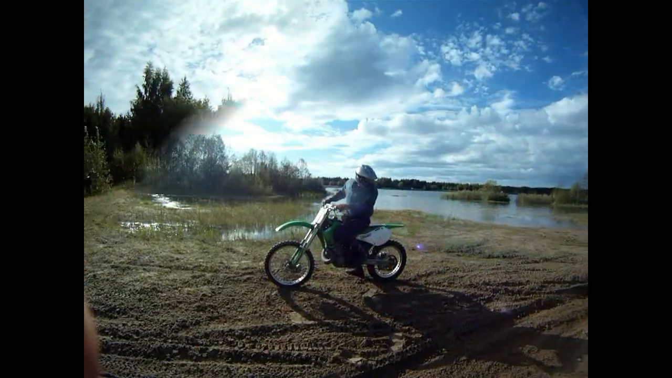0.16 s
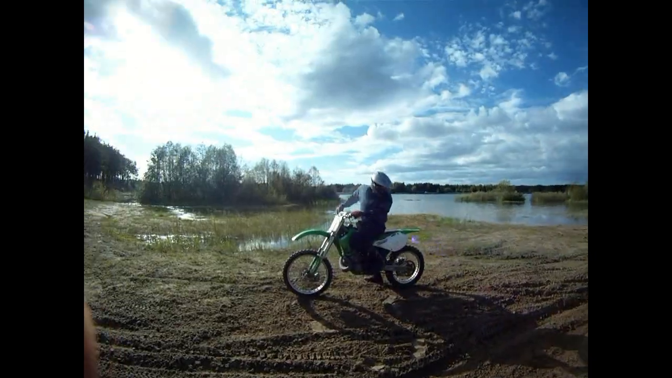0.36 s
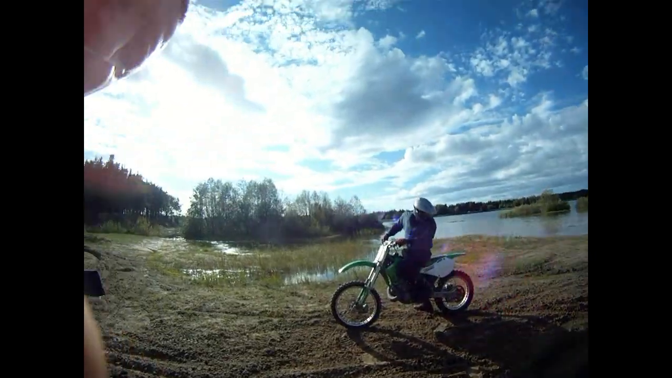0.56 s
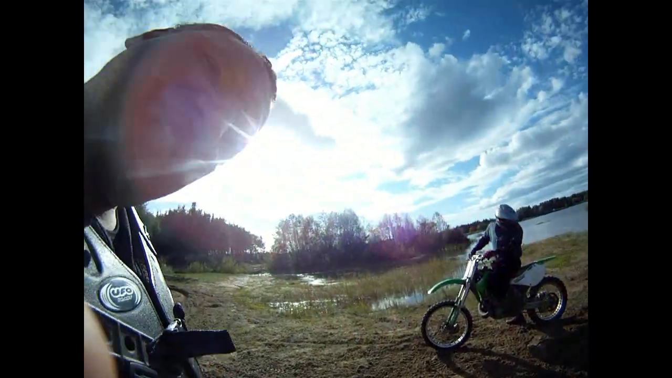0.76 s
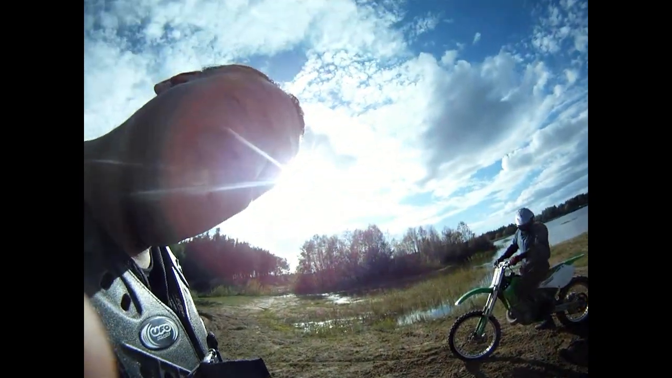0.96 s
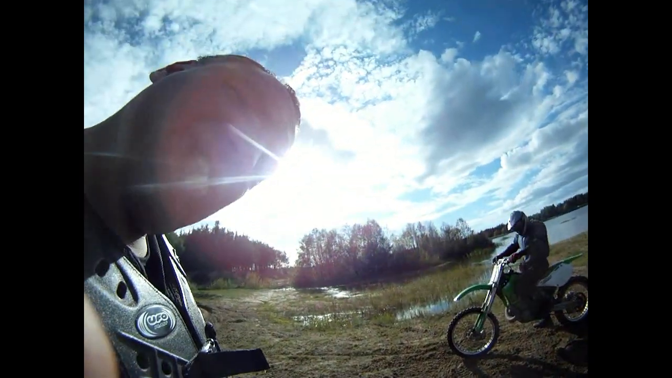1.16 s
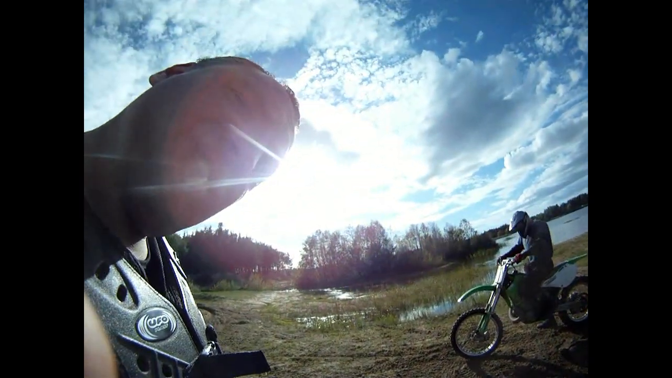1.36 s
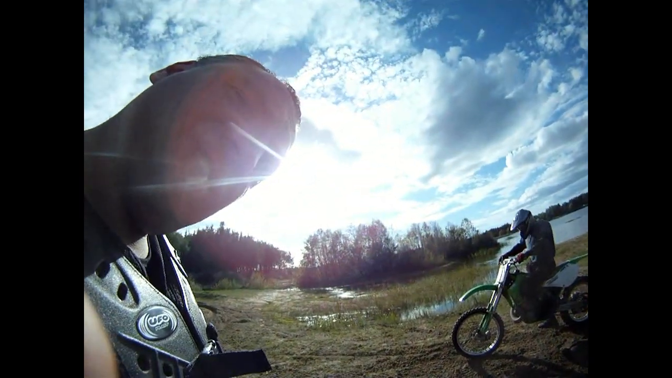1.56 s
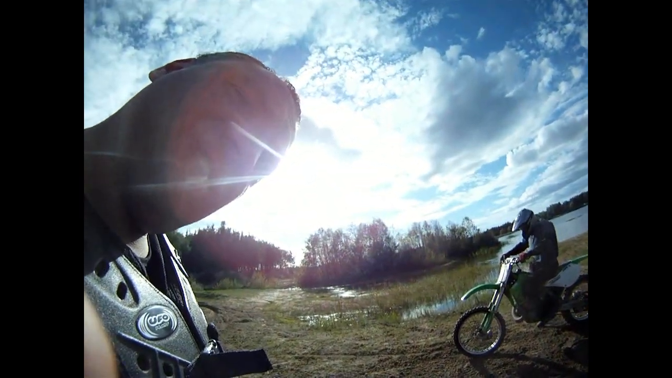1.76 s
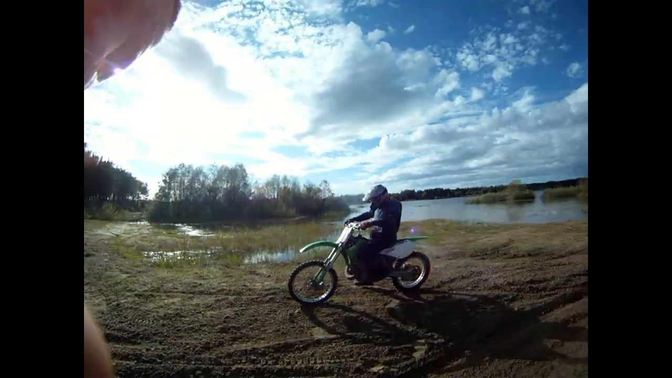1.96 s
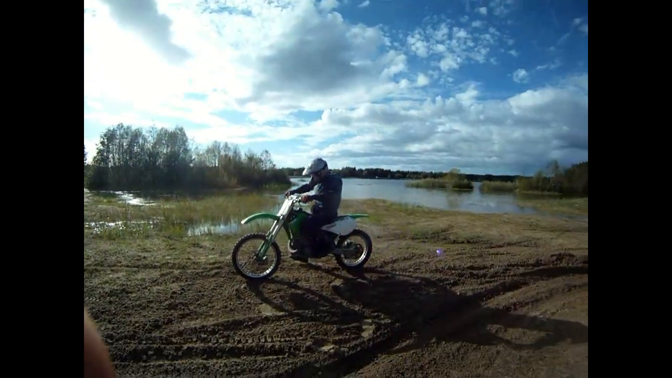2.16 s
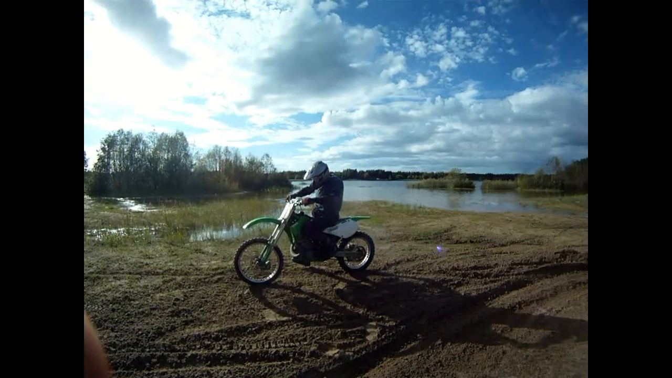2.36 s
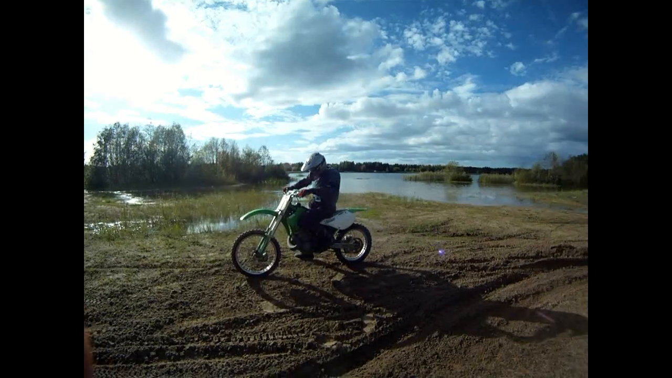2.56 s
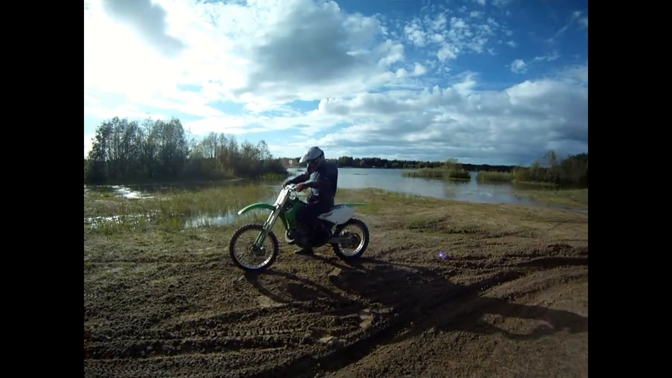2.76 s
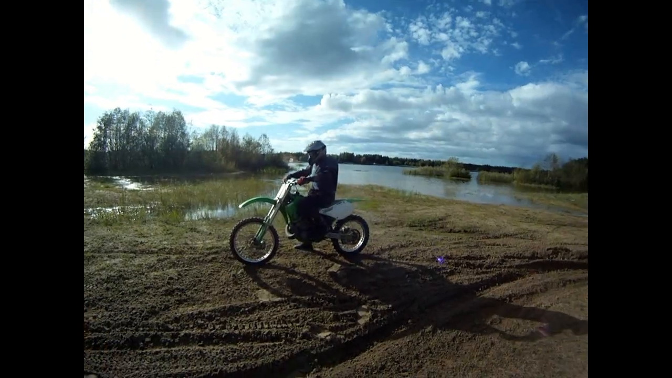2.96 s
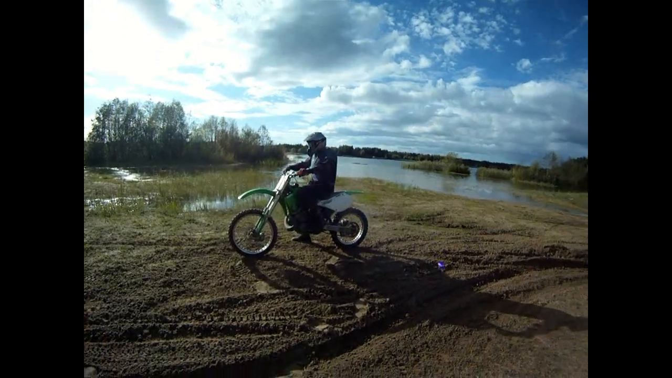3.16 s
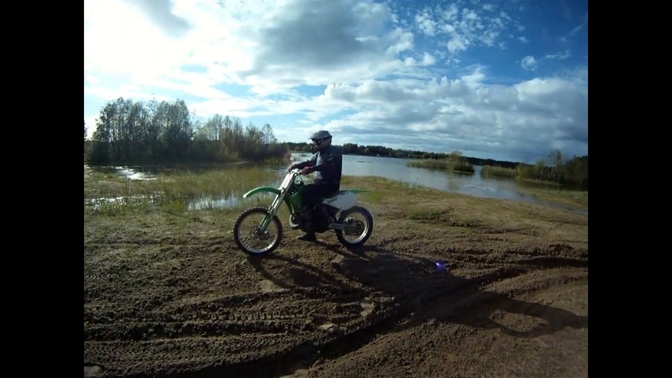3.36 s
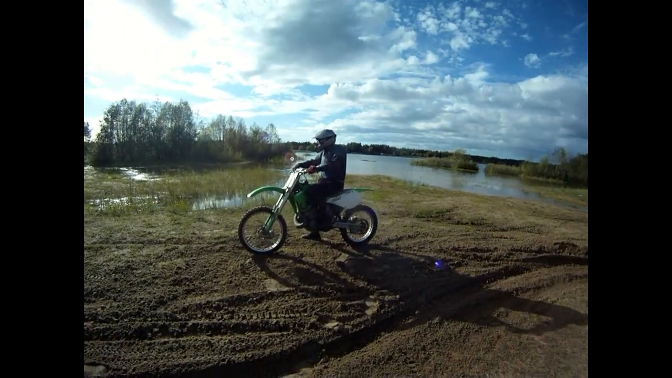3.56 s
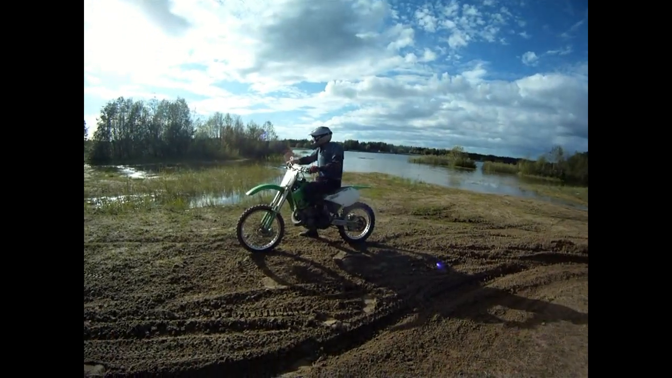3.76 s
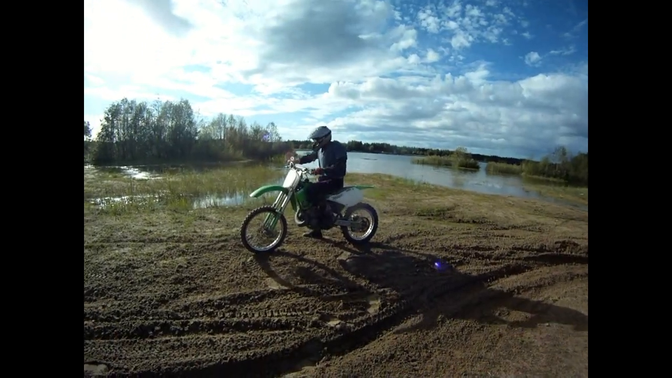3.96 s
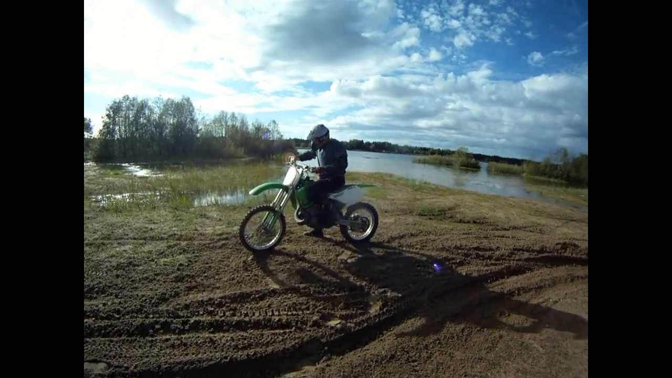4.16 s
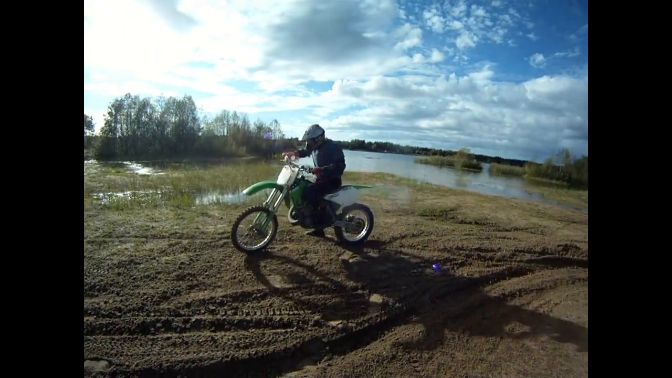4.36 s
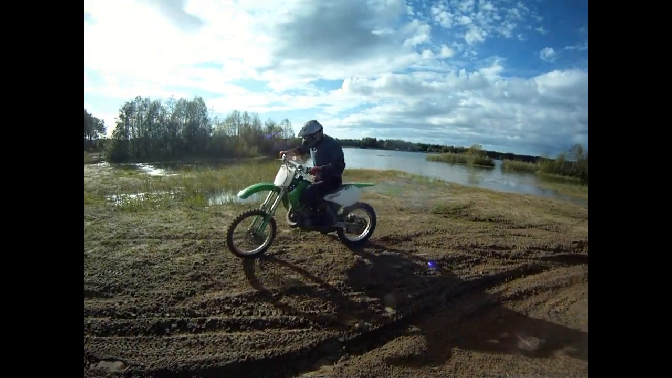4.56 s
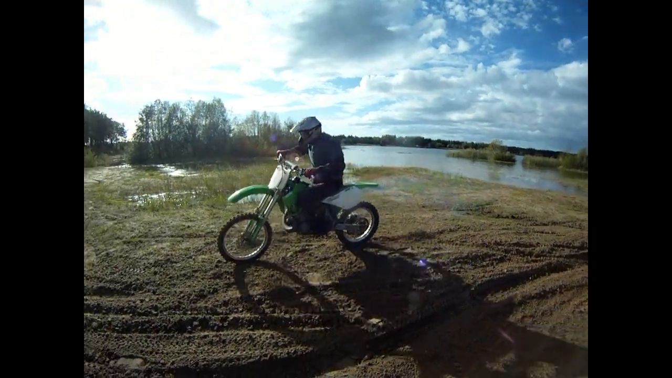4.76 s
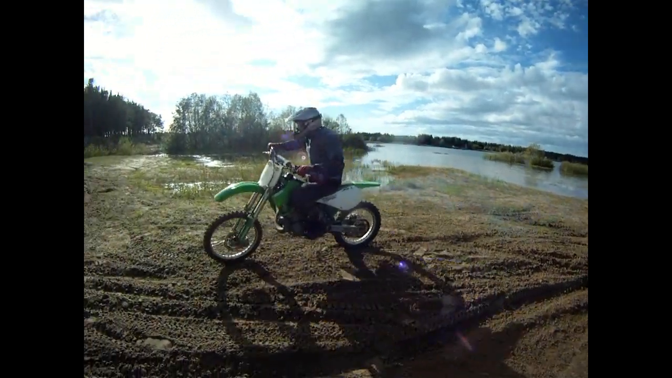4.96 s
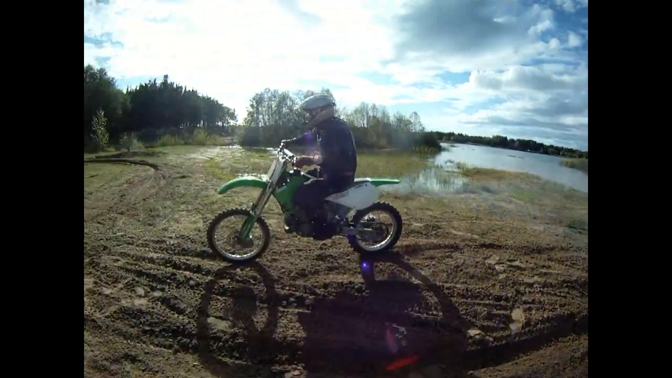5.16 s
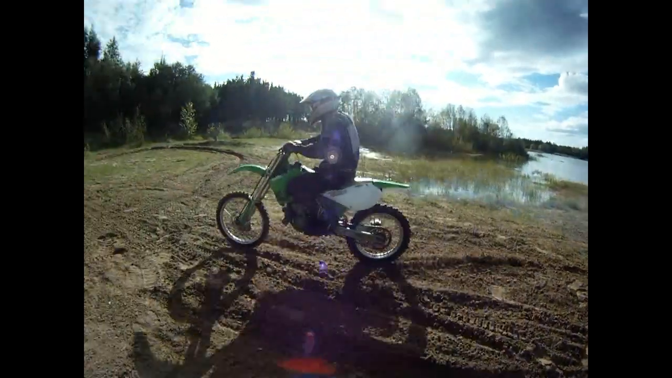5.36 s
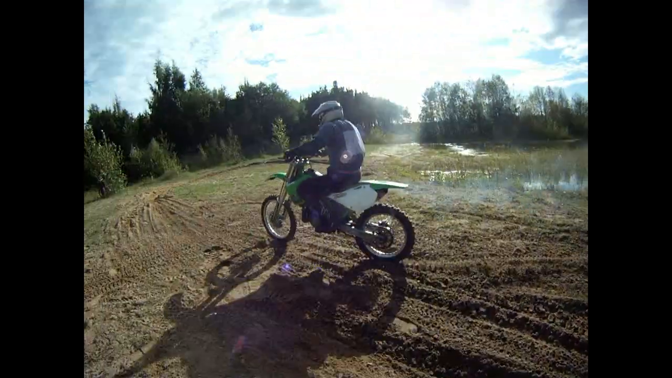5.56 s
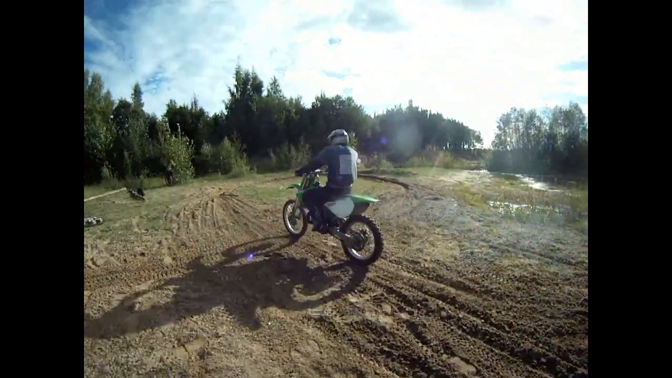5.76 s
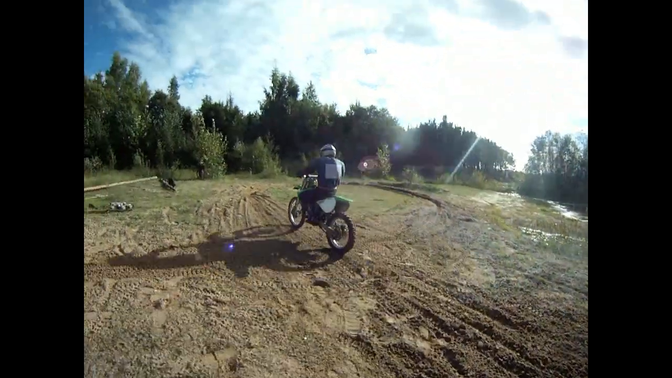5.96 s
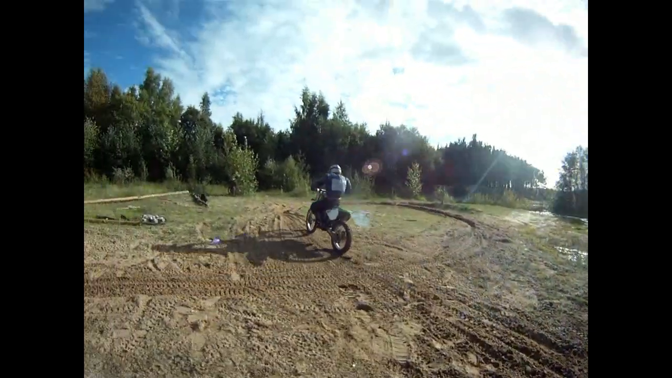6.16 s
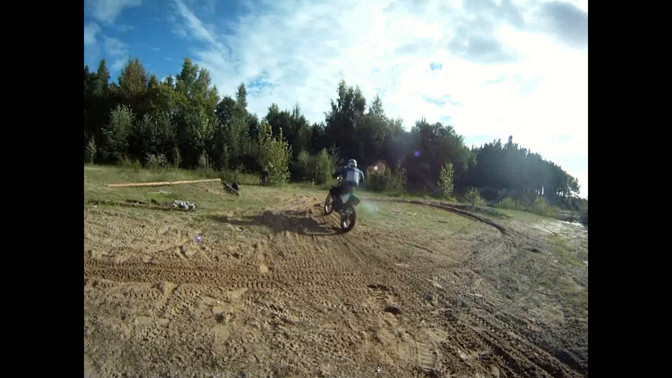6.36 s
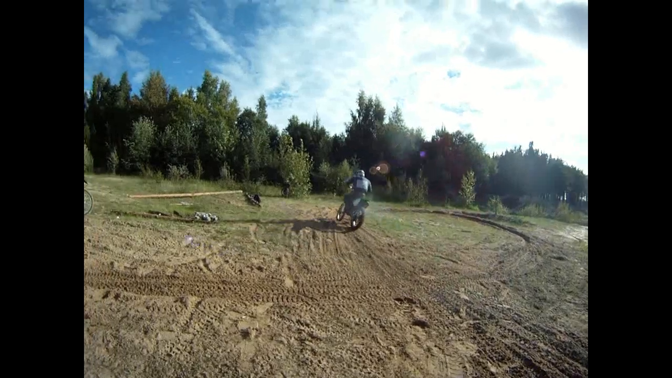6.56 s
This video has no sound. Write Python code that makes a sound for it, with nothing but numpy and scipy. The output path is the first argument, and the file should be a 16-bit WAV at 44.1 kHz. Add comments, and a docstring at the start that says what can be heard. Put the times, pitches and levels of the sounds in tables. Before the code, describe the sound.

A two-stroke dirt bike winds down to a lumpy idle close by, catches with sharp cracks, then pulls away in light wind.

```python
"""A single-cylinder two-stroke dirt bike, heard from close by on the microphone of a cased action camera.
It coasts down from high revs, each firing booming in the expansion pipe and rattling the fins, and by 3 s
is at a lumpy idle. Near 4 s it catches with cracks and chugs, then pulls away under load, tail to the
microphone; at 6 s it blips once more further off. All along, wind buffets the case, and the camera samples
at a low rate and holds each sample, which mirrors the sound into the treble."""
import sys
import numpy as np
from scipy import signal
from scipy.fft import rfft, irfft, next_fast_len
from scipy.io import wavfile
from scipy.ndimage import uniform_filter1d, map_coordinates

SR = 44100
rng = np.random.default_rng(int(sys.argv[2]) if len(sys.argv) > 2 else 0)


def put_to_file(sound):
    """Save the sound as 16-bit audio at rate SR, in the file named by the first command-line argument."""
    columns = np.atleast_2d(sound).T  # one column per channel
    safe = np.clip(columns, -1, 1)
    whole_steps = np.round(safe * 32767)
    wavfile.write(sys.argv[1], SR, whole_steps.astype(np.int16))


N = 292383
T = np.arange(N) / SR
HZ = np.fft.rfftfreq(next_fast_len(N + SR // 2), 1 / SR)

# Engine speed. Each row: time in seconds, firings per second.
REVS = [(0.0, 151.8), (0.66, 112.9), (1.0, 95.2), (1.22, 86.05), (2.12, 61.1), (3.16, 41.89),
        (3.549, 38.38), (3.882, 32.58), (4.021, 55.55), (4.068, 79.8), (4.131, 62.4), (4.26, 75.07),
        (4.36, 78.7), (4.49, 90.1), (4.599, 93.9), (4.732, 90.9), (4.871, 81), (4.928, 81.67),
        (5.13, 77.14), (5.22, 78.5), (5.341, 74.55), (5.602, 70.74), (5.689, 72.4), (5.8, 51.72),
        (6.08, 47.78), (6.149, 71.5), (6.222, 76.85), (6.311, 55), (6.63, 43.46)]
# The rider's hand and the burning. Each row: time in seconds, throttle 0-1, unevenness about 0-1.
BURNING = [(0, 0.14, 0), (2.3, 0.04, 0.43), (3.4, 0.03, 0.84), (3.79, 0, 0.85), (3.805, 0.72, 0.67),
           (3.85, 0, 0.97), (3.975, 0, 0.99), (3.985, 0.91, 0.6), (4.075, 0.7, 0.9), (4.085, 0, 1.02),
           (4.105, 0.1, 0.9), (4.112, 0, 0.77), (4.23, 0.88, 0.03), (5.69, 0.89, 0.02), (5.715, 0.04, 0.43),
           (6.63, 0.17, 0.2)]
# Level at the microphone, throttle shut. Each row: time in seconds, boom in dB, rattle in dB.
SHUT_LEVELS = [(0, -38, -15), (.2, -26.5, -19.5), (.45, -28.5, -20), (.65, -22, -19), (.85, -20.5, -23.5),
               (1.55, -22, -24.5), (1.9, -29, -26), (2.68, -36.5, -28), (3.05, -35, -29.5),
               (3.8, -43.5, -34), (4.2, -33.5, -25.5), (4.74, -34, -26), (4.88, -28, -29),
               (5.0, -30.5, -27), (5.26, -32.5, -29.5), (5.6, -35.5, -29.5), (5.7, -39.5, -30.5),
               (5.85, -37, -30.5), (6.04, -41.5, -33), (6.44, -46.5, -36), (6.63, -61, -42)]
# The level drops at once and climbs back. Each row: start in seconds, depth in dB, recovery in seconds.
LEVEL_DIPS = [(0, 19.5, 0.23), (0.192, 14.5, 0.27), (3.06, 4, 0.4), (6.215, 6.5, 0.073)]
# How the bike faces the microphone.
# Each row: time in seconds, side on 0 to tail on 1, tail pipe ring in dB over the rattle.
FACING = [(0, 0.06, -21), (.63, 0, -9.5), (1.2, 0.16, -40), (2.9, 0.1, -14), (3.9, 0.21, -20),
          (4.25, 0.3, -19), (4.6, 0.19, -50), (5.2, 0.75, -18), (5.5, 0.8, -40), (5.65, 0.88, -19),
          (5.87, 0.72, -1), (6.1, 0.88, -22)]
# Lowest engine orders. Each row: firings per second, then in dB over the rattle the first and the
# second order with the throttle shut, and the first at full throttle.
ORDER_LEVELS = [(40, -34, -26, -10), (50, -25, -12, -22), (57.3, -21, -26, -29), (66.6, -9, -9.5, -30),
                (79, -8, -19.5, -60), (82.6, -10, -11, -51), (90, -21, -11, -29), (94.4, -9, -16, -27),
                (102, -8.5, -14, -26), (123, -7.5, -12.5, -21), (132, -6.5, -26, -25), (160.5, 2, 5, -27)]
# Expansion pipe modes. Each row: centre in Hz, width in Hz, gain in dB.
BELLY_MODE = [(354, 166, 0)]  # the wide belly that all the others pass through
SIDE_MODES = [(226, 77, -5), (372.4, 33, 6.5), (448, 49, 12)]
LOADED_SIDE_MODES = [(382, 45, 4.5), (461, 56, 4.5)]  # damped more
TAIL_MODES = [(304, 70, -4), (375, 33.6, 12), (453, 44, 10.5)]
HOLLOW_MODE = [(234, 25, 0)]  # slow engine
COASTING_MODE = [(657, 96, 0)]  # fast engine off load
# Exhaust bands, each applied twice. Each row: centre in Hz, width in Hz, gain per pass in dB.
BARK_SIDE = [(937, 340, 5.5), (1334, 150, 4)]
BARK_TAIL = [(832, 324, 28), (1440, 170, 27)]
RING_BAND = [(2190, 300, 0)]
SNAP_SIDE_BANDS = [(1960, 540, 1.5), (2470, 530, 0)]
SNAP_TAIL_BANDS = [(1570, 120, 1), (2300, 1200, 0)]
SPIT_BAND = [(4570, 1600, -3.5)]
SPUTTER_BAND = [(255, 290, 5.5)]
# Tail pipe snap under full load. Each row: time in seconds, level in dB over the fins.
SNAP_LEVELS = [(4.2, 1), (4.6, -2), (5.0, 5), (5.4, -1), (5.65, 1)]
# Hard firings, one a turn in a run. Each row: start in seconds, run length in seconds, level in dB.
HARD_FIRINGS = [(0.1842, 0, 4), (0.391, 0, -8), (3.769, 0, -11), (3.802, 0, -4), (3.924, 0, -8.5),
                (3.9343, 0, -3), (3.9816, 0, -2), (4.0264, .05, 0), (4.1104, 0, -3.5), (4.1914, .02, -13),
                (6.0972, .097, 8.5), (6.2015, 0, 5.5), (6.214, 0, -6), (6.253, 0, -9)]
# Tail pipe modes in a crack. Each row: pitch in Hz, level in dB, time to fall 60 dB in seconds.
CRACK_MODES = [(2164, -1, 0.0037), (1760, -10, 0.0041), (2940, -20, 0.019), (2250, -21, 0.033)]
# Chugs as the engine stumbles and catches. Each row: start in seconds, level in dB, pitch in Hz.
CHUG_EVENTS = [(3.045, -14, 298.8), (3.905, -13, 129.9), (3.933, -10, 151), (3.963, -3.5, 153),
               (3.987, -4.5, 390), (4.01, -7, 175), (4.108, -7.5, 416), (4.169, -11, 154), (4.19, -5, 153),
               (6.074, -10.5, 200.8), (6.084, -10, 197), (6.1, -5, 235)]
# Wind on the case. Each row: time in seconds, level in dB.
WIND_LEVELS = [(0, -46.5), (1.5, -49.5), (4.1, -40), (4.7, -73), (5.8, -35), (6.63, -39)]
# Noise spectra at the microphone. Each row: frequency in Hz, relative density in dB.
FINS_SIDE_SPECTRUM = [(900, -17.5), (1250, -3.5), (1590, -9.5), (1750, -0.5), (2200, 1), (2900, -2.5),
                      (3300, -6.5), (3900, -17.5), (4700, -16.5), (6000, -29.5), (8000, -100)]
FINS_TAIL_SPECTRUM = [(900, -16), (1280, -6.5), (1450, -0.5), (1860, -2), (2260, 1), (2800, -6),
                      (3800, -16.5), (5200, -17.5), (6000, -51), (8000, -100)]
FRAME_SPECTRUM = [(40, -57.5), (70, -33), (254, -20), (424, 3), (600, -17), (1500, -63)]
WIND_SPECTRUM = [(10, -6), (25, 7), (60, 1), (150, 8.5), (800, -20)]


def engine(full_load_throttle=.7, slow_hz=58.1, slow_span_hz=8.1):
    """One firing per turn drives the low orders, the pipe, the fins and the silencer."""
    hz, turns = speed()
    boom_db, rattle_db = levels()
    throttle, uneven, away = riding()
    load = np.clip(throttle / full_load_throttle, 0, 1) ** 2
    slow = np.clip((slow_hz - hz) / slow_span_hz, 0, 1) * (1 - throttle)
    fired = np.interp(np.arange(1, int(turns[-1])), turns, T)
    at = (fired * SR).astype(int)
    # uneven burning: each firing differs in strength and comes a little late
    scatter_db = .35 + 1.95 * uneven[at] ** 2 * (1 - away[at] / 2)
    timing, strength, shaking = rng.standard_normal((len(fired), 3)).T
    late_s = np.abs(1e-4 * scatter_db * timing)
    strength_db = scatter_db * strength
    pulses = laid_out(fired + late_s, amp(strength_db)[:, None])
    steady = laid_out(fired, np.ones((len(fired), 1)))
    boom = pipe_boom(pulses, steady, load, slow)
    metal = with_hiss(metal_shake(fired, hz[at], strength_db + 1.36 * shaking))
    snap_gain = load * amp(curves(SNAP_LEVELS, T)[0])
    rattle = (fin_rattle(metal) + snap_gain * tail_snap(pulses, steady)) / np.sqrt(1 + snap_gain ** 2)
    body = low_orders(hz, turns, throttle) + rattle + silencer(metal, slow, away)
    return amp(boom_db) * boom + amp(rattle_db) * body


def speed(slip_s=.1):
    """Firings a second and turns made; drag takes a steady share each second, hence the log scale."""
    times, firings = np.transpose(REVS)
    hz = np.exp(np.interp(T, times, np.log(firings)))
    turns = np.cumsum(hz) / SR
    for start, lasts, _ in HARD_FIRINGS:
        at = round(start * SR)
        if lasts * hz[at] >= 1:  # the stumbling engine falls into step just before a run
            slip = round(turns[at]) - turns[at]
            turns = turns + slip * np.clip(1 + (T - start) / slip_s, 0, 1)
    return hz, turns


def levels(throttle_boom_db=20.5, throttle_rattle_db=10):
    """Boom and rattle in dB at the microphone, from the bike's place, the throttle and the dips."""
    boom_db, rattle_db = curves(SHUT_LEVELS, T)
    throttle = curves(BURNING, T)[0]
    dip_db = sum(db * np.clip(1 - (T - s) / back, 0, 1) * (T >= s) for s, db, back in LEVEL_DIPS)
    return (boom_db + throttle_boom_db * throttle - dip_db,
            rattle_db + throttle_rattle_db * throttle - dip_db)


def riding():
    """Throttle, uneven burning and rolling away (tail on, throttle shut), each 0-1."""
    throttle, uneven = np.clip(curves(BURNING, T), 0, 1)
    return throttle, uneven, curves(FACING, T)[0] * (1 - throttle)


def turned(side, rear):
    """The microphone hears less of the side and more of the tail as the bike turns."""
    angle = curves(FACING, T)[0] * np.pi / 2
    return np.cos(angle) * side + np.sin(angle) * rear


def pipe_boom(pulses, steady, load, slow, hollow_db=-6, coasting_db=-21):
    """Firings ring the expansion pipe: more damped under load, hollow when the engine is slow."""
    def piped(modes):
        return through(pulses, resonances(modes) * resonances(BELLY_MODE), steady)
    side = (1 - load) * piped(SIDE_MODES) + load * piped(LOADED_SIDE_MODES)
    hollow = slow * amp(hollow_db) * piped(HOLLOW_MODE)
    coasting = (1 - slow) * (1 - load) * amp(coasting_db) * piped(COASTING_MODE)
    return turned(side, piped(TAIL_MODES)) + hollow + coasting


def low_orders(hz, turns, throttle, open_second_db=-13.5):
    """Hum at the firing rate and its octave."""
    first_db, second_db, open_first_db = curves(ORDER_LEVELS, hz)
    first = amp(first_db + (open_first_db - first_db) * throttle) * np.sin(2 * np.pi * turns)
    second = amp(second_db + (open_second_db - second_db) * throttle) * np.sin(4 * np.pi * turns)
    return np.sqrt(2) * (first + second)


def metal_shake(fired, hz, strength_db, coast_turns=8.4, idle_turns=2.2, load_t60_s=.025, rise_s=.0055):
    """Each firing shakes the metal much like the one before, so blurred lines reach into the treble."""
    throttle, uneven, _ = np.array(riding())[:, (fired * SR).astype(int)]
    shut_t60 = (coast_turns + (idle_turns - coast_turns) * uneven ** 2) / hz
    t60 = shut_t60 * (1 - throttle) + load_t60_s * throttle
    alike = .975 - .475 * uneven
    shake = rng.standard_normal((len(fired), SR // 20))
    for k in range(1, len(fired)):
        shake[k] = alike[k] * shake[k - 1] + np.sqrt(1 - alike[k] ** 2) * shake[k]
    age = np.arange(shake.shape[1]) / SR
    dying = amp(-60 * age / t60[:, None]) * (1 - np.exp(-age / rise_s))
    dying /= np.linalg.norm(dying, axis=1)[:, None]
    size = amp(strength_db) * np.sqrt(SR / hz)
    return laid_out(fired, shake * dying * size[:, None])


def with_hiss(shake, idle_db=-15, away_db=8.5, throttle_db=-2):
    """Chain, gears and intake hiss between the firings; the total power stays about the same."""
    throttle, uneven, away = riding()
    idling = uneven * (1 - throttle)
    gain = amp(-3 + idle_db * idling + away_db * away + throttle_db * throttle)
    return (shake + gain * rng.standard_normal(N)) / np.sqrt(1 + gain ** 2)


def fin_rattle(metal):
    """The cooling fins radiate the shaking as a bright rattle."""
    return turned(shaped(metal, colour(FINS_SIDE_SPECTRUM)), shaped(metal, colour(FINS_TAIL_SPECTRUM)))


def tail_snap(pulses, steady, late_s=.0025):
    """Each firing snaps cleanly at the tail pipe, delayed to ride the crest of the boom."""
    delay = np.exp(-2j * np.pi * HZ * late_s)
    side = through(pulses, resonances(SNAP_SIDE_BANDS) ** 2 * delay, steady)
    rear = through(pulses, resonances(SNAP_TAIL_BANDS) ** 2 * delay, steady)
    return turned(side, rear)


def silencer(metal, slow, away, bark_db=-17.5, slow_db=11.5, away_db=6):
    """The shaken silencer barks, more when slow or rolling away, and its tail pipe rings."""
    bark = turned(shaped(metal, resonances(BARK_SIDE) ** 2), shaped(metal, resonances(BARK_TAIL) ** 2))
    ring = shaped(metal, resonances(RING_BAND) ** 2)
    ring_db = curves(FACING, T)[1]
    return amp(bark_db + slow_db * slow + away_db * away) * bark + amp(ring_db) * ring


def cracks(fall_db=1.5, load_sag=.15, rise_s=.00027, ground_s=.0014, spit_t60_s=.01):
    """Hard firings crack in the tail pipe, doubled by the ground; from behind they spit more gas."""
    turns = speed()[1]
    firings = []
    for start, lasts, db in HARD_FIRINGS:
        first, last = np.interp([start, start + lasts], T, turns)
        for k in range(int(last - first) + 1):
            firings.append((np.interp(first + k, turns, T), db - fall_db * k))
    starts, db = np.transpose(firings)
    gain = amp(db[:, None])
    tail = curves(FACING, starts)[0][:, None]
    throttle = curves(BURNING, starts)[0][:, None]
    pitch = 1 - load_sag * throttle * (1 - tail)  # sinks under load, side on
    age = np.arange(SR // 25) / SR
    scatter = rng.standard_normal((len(starts), len(CRACK_MODES), 2))
    ring = 0
    for k, (hz, mode_db, t60) in enumerate(CRACK_MODES):
        dying = amp(mode_db + 1.5 * scatter[:, k, :1] - 60 * age / t60)
        detune = 1 + .03 * scatter[:, k, 1:]
        ring = ring + dying * np.sin(2 * np.pi * hz * pitch * detune * age)
    ring *= 1 - np.exp(-age / rise_s)
    bounce = .6 * np.pad(ring, ((0, 0), (round(ground_s * SR), 0)))[:, :len(age)]
    gas = tail * gain * amp(-60 * age / spit_t60_s) * rng.standard_normal(ring.shape)
    spit = filtered(laid_out(starts, gas), resonances(SPIT_BAND) ** 2)
    return laid_out(starts, gain * (ring + bounce)) + spit


def chugs(rise_s=.0025, t60_s=.03):
    """Soft low pushes from the pipe, each with a sputter of rough gas."""
    starts, db, hz = np.transpose(CHUG_EVENTS)
    age = np.arange(SR // 15) / SR
    swell = amp(db[:, None] - 60 * age / t60_s) * (1 - np.exp(-age / rise_s))
    push = laid_out(starts, swell * np.sin(2 * np.pi * hz[:, None] * age))
    gas = laid_out(starts, swell * rng.standard_normal(swell.shape))
    return push + filtered(gas, resonances(SPUTTER_BAND) ** 2)


def frame_rumble(under_rattle_db=21.5, uneven_db=17):
    """Tyres and frame rumble under the engine, more when it burns unevenly and is side on."""
    roughness = curves(BURNING, T)[1] * (1 - curves(FACING, T)[0] / 2)
    db = levels()[1] - under_rattle_db + uneven_db * roughness + wobble(3.6)
    return amp(db) * shaped(rng.standard_normal(N), colour(FRAME_SPECTRUM))


def wind():
    """Wind buffets the case, right at the microphone."""
    db = curves(WIND_LEVELS, T)[0] + .33 * wobble(2.63)
    return amp(db) * shaped(rng.standard_normal(N), colour(WIND_SPECTRUM))


def amp(db):
    """Gain of a level in dB."""
    return 10 ** (np.asarray(db) / 20)


def curves(rows, at):
    """Each later column, read at these values of the first."""
    axis, *columns = np.transpose(rows)
    return [np.interp(at, axis, column) for column in columns]


def colour(points):
    """Gain of (Hz, dB) points on a log axis."""
    hz, db = np.transpose(points)
    return amp(np.interp(np.log(HZ + 1), np.log(hz + 1), db))


def resonances(modes):
    """Causal response of (Hz, width, dB) modes, alternating in sign."""
    return sum((-1) ** k * amp(db) * 1j * HZ * width / (hz ** 2 - HZ ** 2 + 1j * HZ * width)
               for k, (hz, width, db) in enumerate(modes))


def filtered(x, response):
    """x through a response given on the grid HZ."""
    size = 2 * (len(HZ) - 1)
    return irfft(rfft(x, size) * response, size)[..., :N]


def shaped(x, response):
    """x filtered and scaled to rms 1."""
    y = filtered(x, response)
    return y / np.sqrt(np.mean(y ** 2) + 1e-20)


def through(pulses, response, steady):
    """Pulses filtered and scaled so that the steady ones would hold rms 1."""
    power = uniform_filter1d(filtered(steady, response) ** 2, size=SR // 12)
    return filtered(pulses, response) / np.sqrt(np.abs(power) + 1e-12)


def wobble(rate):
    """A smooth random curve, rate knots a second."""
    return map_coordinates(rng.standard_normal(int(N * rate / SR) + 4), [T * rate])


def laid_out(starts, bursts):
    """One burst (row) at each start in seconds."""
    at = np.round(starts * SR).astype(int)[:, None] + np.arange(bursts.shape[1])
    return np.bincount(at.ravel(), bursts.ravel(), N + SR)[:N]


def scene():
    """The bike and the wind at the one microphone."""
    return (engine() + cracks() + chugs() + wind() + frame_rumble())[None]


def record(dry, ceiling=.7, sample_hz=12000, hold=4, top_hz=15400):
    """The camera's input saturates and is sampled at a low rate; holding each sample mirrors it upward."""
    soft = dry / (1 + np.abs(dry / ceiling) ** 4) ** (1 / 4)
    sampled = signal.resample_poly(soft, sample_hz, SR, axis=1)
    held = signal.resample_poly(np.repeat(sampled, hold, axis=1), SR, hold * sample_hz, axis=1)
    return filtered(held, HZ < top_hz)


dry = scene()
out = record(dry)
put_to_file(out)
```